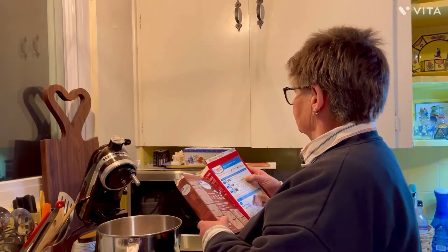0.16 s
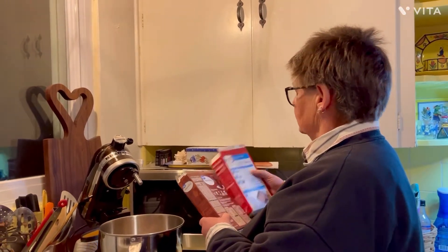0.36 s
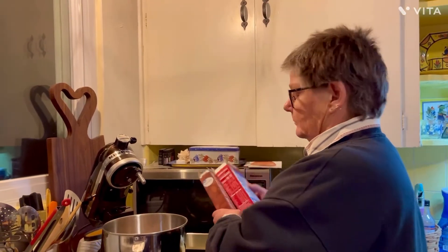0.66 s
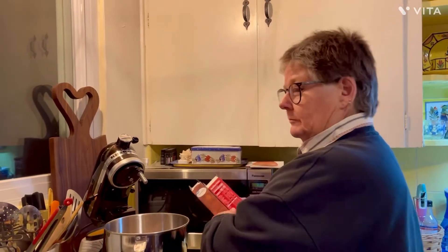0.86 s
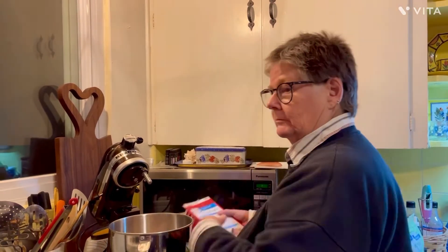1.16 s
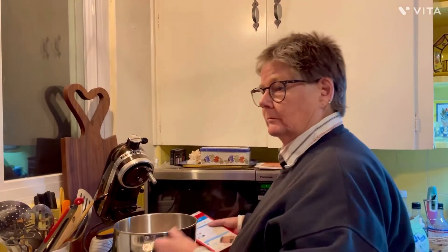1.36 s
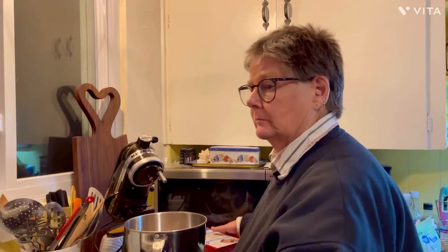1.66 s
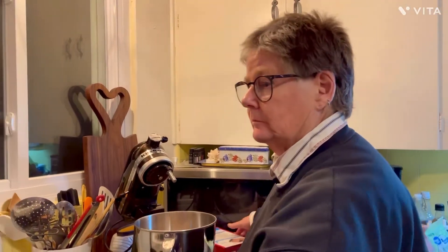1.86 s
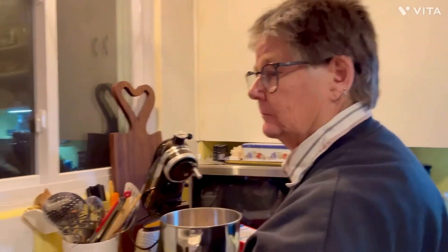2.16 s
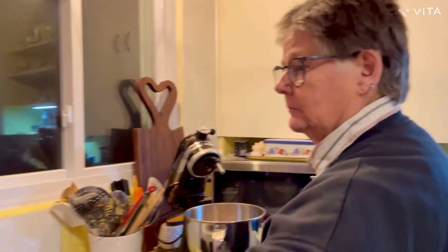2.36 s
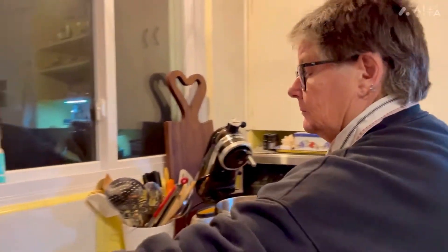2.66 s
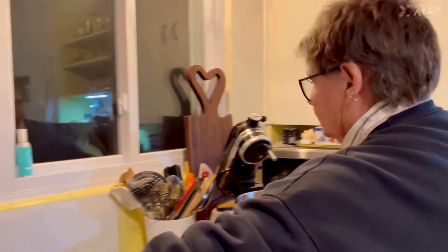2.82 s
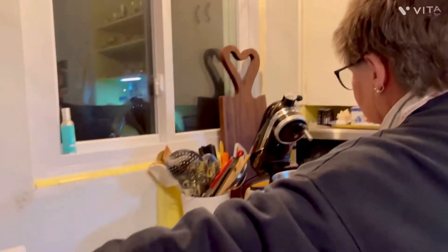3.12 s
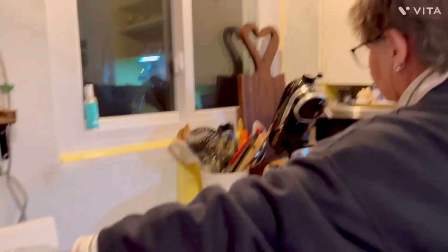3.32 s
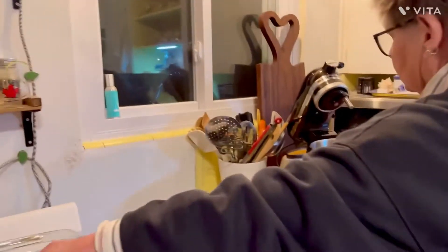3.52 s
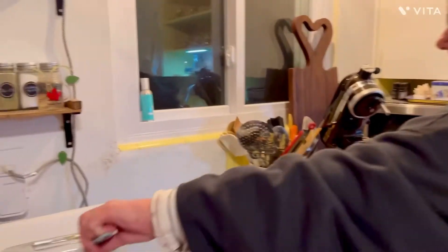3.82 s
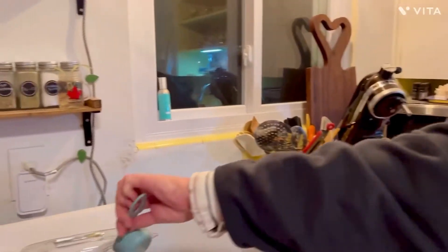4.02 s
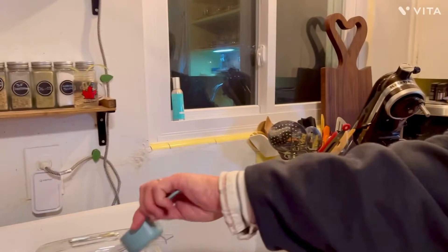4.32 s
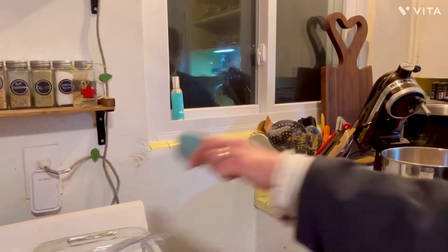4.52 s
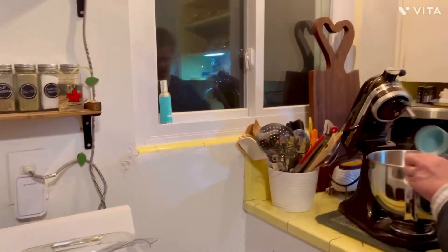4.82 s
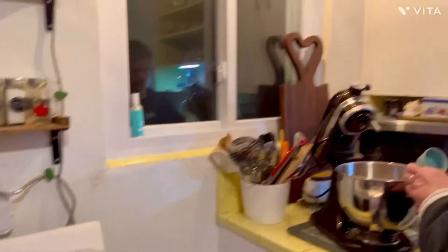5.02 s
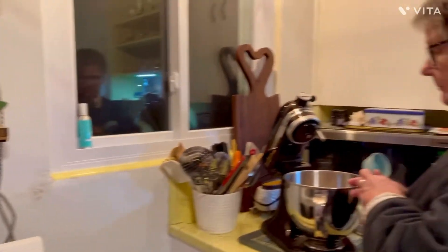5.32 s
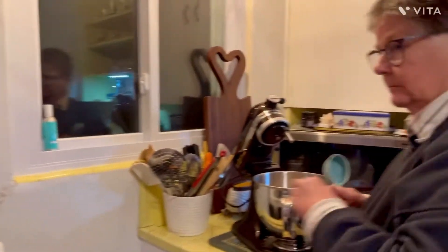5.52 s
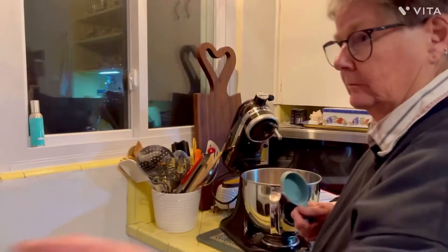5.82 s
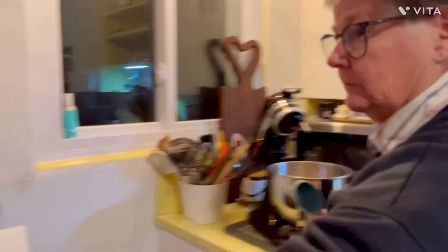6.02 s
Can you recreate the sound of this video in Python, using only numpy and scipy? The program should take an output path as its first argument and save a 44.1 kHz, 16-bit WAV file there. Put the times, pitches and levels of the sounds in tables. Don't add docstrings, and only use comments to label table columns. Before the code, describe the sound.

Dull, hollow card knocks and short scuffs come in clusters while sleeves rustle close by. Then hard plastic cups are pulled from a rack at left, clicking sharply in irregular bursts with brief wall rings and low thumps, moving toward the centre as they are lifted. Afterwards only faint hum, soft cloth movement and tiny finger taps remain. Small live kitchen, hand-held stereo phone.

```python
import sys
import numpy as np
from scipy import signal
from scipy.fft import rfft, irfft, next_fast_len
from scipy.io import wavfile
from scipy.ndimage import uniform_filter1d, map_coordinates

SR = 44100
rng = np.random.default_rng(int(sys.argv[2]) if len(sys.argv) > 2 else 0)


def master(y):
    cut = np.clip(np.atleast_2d(y).T, -1, 1)
    pcm = np.round(cut * 32767)
    wavfile.write(sys.argv[1], SR, pcm.astype(np.int16))


def volts_from_decibels(level):
    exponent = np.asarray(level, float) / 20
    return 10 ** exponent


N = 272375


def unit(x):
    return x / np.sqrt(np.mean(x ** 2) + 1e-20)


def along(points, hz):
    f, value = np.transpose(points)
    return np.interp(np.log(hz + 1), np.log(f + 1), value)


def wobble(rate):
    t = np.arange(0, N + 16, 16) / SR
    knots = rng.standard_normal(int(N * rate / SR) + 4)
    return np.interp(np.arange(N) / SR, t, map_coordinates(knots, [t * rate]))


def swells(times, fade_s, db):
    rise_share = 0.89
    t = np.arange(0, N, 64) / SR
    late = (t - np.c_[times]) / np.c_[fade_s]
    gains = volts_from_decibels(np.c_[db] - 10 * np.maximum(late, -late / rise_share))
    return np.interp(np.arange(N) / SR, t, np.sqrt((gains ** 2).sum(axis=0)))


def filtered(x, response):
    n = x.shape[-1]
    m = next_fast_len(n + 8192)
    return irfft(rfft(x, m) * response(np.fft.rfftfreq(m, 1 / SR)), m)[..., :n]


def shifted(x, lead, colour):
    def response(hz):
        turn = np.outer([.5, -.5], along(lead, hz))
        return volts_from_decibels(along(colour, hz)) * np.exp(1j * turn)
    return filtered(x, response)


# (frequency [Hz], likeness [0 to 1])
PORT_LIKENESS = [(60, .92), (160, .96), (300, .9), (500, .62), (1200, .62), (2500, .62), (7000, .45),
                 (8200, .78), (9400, .88), (9900, .995), (10700, .995), (11200, .9), (13000, .8)]


def spread(pair):
    def response(hz):
        turn = np.arccos(np.clip(along(PORT_LIKENESS, hz), -1, 1)) / 2
        return np.array([np.cos(turn), np.sin(turn)])
    mid, side = filtered(pair, response)
    return np.array([mid + side, mid - side])


def rush(spectrum, patchy_db):
    z = signal.stft(rng.standard_normal((2, N)), nperseg=512)[2]
    field = uniform_filter1d(rng.standard_normal(z.shape[1:]), size=6, axis=0)
    field = uniform_filter1d(field, size=8, axis=1)
    pair = signal.istft(z * volts_from_decibels(patchy_db * unit(field)), nperseg=512)[1][:, :N]
    return unit(filtered(pair, lambda hz: volts_from_decibels(along(spectrum, hz))))


def ring(modes, t, scatter_db, rough):
    hz, db, t60 = np.transpose(modes)[:, :, None]
    steps = rng.standard_normal((len(hz), len(t) // 16 + 1)).repeat(16, axis=1)
    chance = rng.standard_normal((2, 2, len(hz)))
    life = t[t < t60.max()]
    waver = rough * np.cumsum(steps[:, :len(life)], axis=1) * np.sqrt(hz / SR) / 4
    tones = volts_from_decibels(db - 60 * life / np.maximum(t60, .005)) * np.sin(2 * np.pi * hz * life + waver)
    views = (volts_from_decibels(scatter_db * chance[0]) * np.sign(chance[1])) @ tones
    return np.pad(views, ((0, 0), (0, len(t) - len(life)))) / np.abs(views[0]).max()


def crack(t, t60, lo_hz, hi_hz):
    band = signal.butter(2, [lo_hz, hi_hz], "bandpass", fs=SR, output="sos")
    burst = signal.sosfilt(band, rng.standard_normal((2, len(t))) * volts_from_decibels(-60 * t / t60))
    return burst / np.abs(burst[0]).max()


def chatter(length_s):
    t, chance = np.arange(SR // 24) / SR, rng.random((2, SR // 24))
    happens = chance[0] < .02
    touches = happens * (2 * chance[1] - 1) * np.exp(-t / max(length_s, .0005))
    touches[0] = 1.09
    return touches[None] / np.linalg.norm(touches)


def struck(sound, length_s):
    hit = signal.fftconvolve(sound, chatter(length_s), axes=1)
    return hit / np.abs(hit[0]).max()


# (frequency [Hz], time to fall 60 dB [s])
KITCHEN_DECAY = [(150, 0.61), (400, 0.38), (1000, 0.23), (3000, 0.23), (10000, 0.19), (12300, .15),
                 (13300, .02)]


def tails(count):
    hz, t, z = signal.stft(rng.standard_normal((count, 2, SR // 4)), SR, nperseg=256)
    fade = volts_from_decibels(-60 * t / along(KITCHEN_DECAY, hz)[:, None])
    tail = signal.istft(z * fade, SR, nperseg=256)[1]
    return tail / np.linalg.norm(tail[:, :1], axis=2, keepdims=True)


def kitchen(x, tail, wet_db):
    late = np.pad(x[:1], ((0, 0), (130, 0)))
    wet = volts_from_decibels(wet_db) * signal.fftconvolve(late, tail, axes=1)
    wet[:, :x.shape[1]] += x
    return wet


def add(track, s, x):
    track[:, round(s * SR):][:, :x.shape[1]] += x


def notes(rows, rise_cycles, rough, wet_db):
    out = np.zeros((2, N + SR))
    for s, db, hz, t60 in rows:
        t = np.arange(int(SR * np.clip(t60, .005, .25))) / SR
        chance = rng.standard_normal(SR // 64 + 2)
        waver = rough * np.cumsum(chance[1:])[np.arange(len(t)) // 16] * np.sqrt(hz / SR) / 4
        shape = volts_from_decibels(-60 * t / max(t60, .005)) * (1 - np.exp(-t * hz / rise_cycles))
        turn = 2 * np.pi * hz * t + waver
        views = np.array([np.sin(turn), 0.57 * np.tanh(chance[0]) * np.cos(turn)])
        add(out, s, volts_from_decibels(db) * shape / shape.max() * views)
    return kitchen(out, tails(count=1)[0], wet_db)[:, :N]


# (frequency [Hz], density [dB per Hz])
AIR_SPECTRUM = [(25, -58), (100, -0.5), (200, 0), (300, -4), (450, -13), (640, -21.5), (770, -11.5),
                (950, -30.5), (1250, -40.5), (2300, -25), (4000, -34), (9000, -37), (12000, -51.5),
                (13500, -120)]


def room_air():
    return volts_from_decibels(-55) * rush(AIR_SPECTRUM, patchy_db=-1.9)


# (frequency [Hz], density [dB per Hz])
RUMBLE_SPECTRUM = [(15, -59), (30, -7.5), (60, 9), (100, -9), (160, -4), (300, -120)]
# (time [s], level [dB])
GRIP_JOLTS = [(.02, -50), (.69, -55), (1.24, -45), (1.58, -45), (2.33, -52), (3.44, -50.5), (3.72, -40.5),
              (4.54, -54), (5.18, -59), (6.07, -70)]


def rumble():
    jolt_fade_s, house_db = 0.083, -58
    s, db = np.transpose(GRIP_JOLTS)
    jolts = swells(s, np.full(len(s), jolt_fade_s), db)
    house = volts_from_decibels(house_db + 1.1 * wobble(3.9))
    return np.hypot(jolts, house) * rush(RUMBLE_SPECTRUM, patchy_db=1.5)


# (frequency [Hz], level [dB rms], unsteadiness [dB])
FRIDGE_TONES = [(132.6, -55.5, -1.1), (64, -84, 0), (261.3, -66, 3), (229, -68, 3), (1675, -85.5, 3.5)]


def fridge():
    t, hum = np.arange(N) / SR, 0
    for hz, db, loose_db in FRIDGE_TONES:
        level = volts_from_decibels(db + 4.0 + loose_db * wobble(16))
        hum = hum + level * np.sin(2 * np.pi * hz * t + 0.63 * loose_db * wobble(6.3))
    return hum


# (peak time [s], time to fade 10 dB [s], level [dB], crispness [dB])
RUB_STROKES = [(.31, .15, -66.5, -19), (.68, .13, -58, -14), (.95, .2, -69, -22), (1.22, .15, -74, -9),
               (1.45, .14, -63, -14), (1.63, .1, -60, -22), (1.86, .2, -75, -22), (2.29, .15, -71, -20),
               (2.68, .3, -72, -15), (2.93, .1, -60, -21), (3.36, .13, -57.5, -20), (3.47, .1, -59, -30),
               (3.7, .1, -57, -28), (3.97, .2, -57.5, -18), (4.15, .15, -64, -17), (4.45, .3, -75, -11),
               (4.75, .15, -77, -20), (4.96, .1, -80, -13), (5.39, .1, -75, -13), (5.63, .1, -74, -15),
               (5.85, .6, -68, -26)]
# (frequency [Hz], density [dB per Hz])
RUB_HISS = [(1500, -60), (3000, -5), (5000, -1), (7000, -1), (9000, -1), (11400, -2), (11900, -10),
            (12500, -120)]
# (frequency [Hz], density [dB per Hz])
RUB_BODY = [(150, -17), (350, 8.5), (800, 6), (1250, 2), (1900, 2.5), (2600, -3), (4000, -11.5),
            (7000, -17)]


def rustle():
    stir_s = 0.29
    s, fade_s, db, crisp_db = np.transpose(RUB_STROKES)
    moving = np.clip((np.arange(N) / SR - stir_s) / 0.084 + 1, 0, 1)
    grain = volts_from_decibels(1.2 * wobble(40) + 1.2 * wobble(300))
    hiss = volts_from_decibels(24.0) * swells(s, fade_s, db + crisp_db) * rush(RUB_HISS, patchy_db=2.5)
    body = volts_from_decibels(11.5) * swells(s, fade_s, db) * rush(RUB_BODY, patchy_db=1.9)
    return moving * grain * (hiss + body)


# (time [s], peak level
# [dB], chatter [s])
SCUFF_EVENTS = [(.616, -41, .02), (.668, -39, .02), (.697, -41, .012), (1.222, -44, .004),
                (1.524, -43, .008), (1.584, -37, .012), (1.594, -35, .01), (1.62, -44, .015),
                (3.372, -24, .001), (3.428, -38, .004), (5.3305, -53, .001), (5.434, -52, .006),
                (5.601, -51, .001), (2.2935, -42, .001), (2.9505, -22, .0006), (3.2955, -21, .0006),
                (3.3135, -22, .0006), (3.3245, -19, .0006), (3.8145, -23, .0006), (3.6255, -31, .0006),
                (1.533, -41, .004), (.77, -44, .004), (.647, -41, .004)]


def scuffs():
    out, t = np.zeros((2, N + SR)), np.arange(SR // 40) / SR
    room = tails(count=1)[0]
    for s, db, length_s in SCUFF_EVENTS:
        scuff = struck(crack(t, .012, 800, 5000), length_s)
        add(out, s, volts_from_decibels(db) * kitchen(scuff, room, wet_db=-7))
    return out[:, :N]


# (time [s], peak level [dB])
TICK_EVENTS = [
    (.952, -55),
    (1.185, -49),
    (1.7548, -43.5),
    (5.352, -56),
    (5.426, -50),
    (5.598, -59),
]


def ticks():
    out, t = np.zeros((2, N + 2 * SR)), np.arange(SR // 7) / SR
    for (s, db), room in zip(TICK_EVENTS, tails(count=13)):
        tick = struck(crack(t, 0.02, 2000, 7000), 0.01)
        add(out, s, volts_from_decibels(db) * kitchen(tick, room, wet_db=-3))
    return out[:, :N]


# (frequency [Hz], level [dB])
CARD_MODES = [(135, -15), (200, -15), (250, -0.5), (300, -6.5), (385, -4.5), (470, -3.5), (735, 0.5),
              (900, -0.5), (1010, -6.5), (1270, 0)]


def knock(hz, edge_db, t60, length_s):
    t = np.arange(SR // 7) / SR
    grip = 1 + 0.037 * rng.standard_normal(len(CARD_MODES))
    modes = [(hz, 2, .5 * t60)]
    for (f, level), g in zip(CARD_MODES, grip):
        mode_t60 = 0.57 * t60 * (300 / f) ** 0.27
        modes.append((f * g, level - 10 * abs(np.log2(f / hz)), mode_t60))
    body = ring(modes, t, scatter_db=3.0, rough=0.36) + 0.42 * crack(t, 0.88 * t60, .5 * hz, 2 * hz)
    edge = volts_from_decibels(edge_db - 7.0) * crack(t, 0.067, 440, 2800)
    return struck(body * (1 - np.exp(-t / 0.0023)) + edge, 0.51 * length_s)


# (time [s], peak level [dB], loudest ring [Hz], edge [dB])
BOX_KNOCKS = [(.351, -40.5, 500, -3), (0.483, -43, 239, 4), (.515, -26.5, 421, -23), (0.571, -36, 367, -40),
              (.617, -29, 358, -13), (.644, -30.5, 343, -20), (.67, -26, 681, -10.5), (0.698, -35, 432, -9),
              (.765, -36, 387, -30), (.934, -45, 264, 5), (1.182, -37.5, 203, -4), (1.219, -26, 440, -13),
              (1.231, -26, 279, -35), (1.288, -38, 356, -32), (1.529, -33.5, 1062, -12),
              (1.538, -29, 263, -43), (1.574, -33, 393, -27), (1.589, -27, 401, -6), (1.613, -34, 330, -41),
              (1.643, -40, 251, -31), (1.796, -42.5, 197, -4), (2.268, -45, 650, -11),
              (2.292, -37, 178, -18)]
# (time [s], peak level [dB], loudest ring [Hz])
RACK_THUMPS = [(2.86, -29, 734), (2.879, -34, 595), (2.949, -39, 299), (3.295, -36.5, 293),
               (3.334, -30, 762), (3.371, -36.5, 287), (3.585, -34.5, 288), (3.624, -34.5, 251),
               (3.816, -31, 672), (3.839, -31.5, 345), (4.012, -29, 781), (4.108, -32.5, 735)]
# (time [s], peak level [dB], loudest ring [Hz])
FINGER_TAPS = [
    (.236, -47.5, 863),
    (.264, -60, 860),
    (2.08, -52, 844),
    (5.33, -48.5, 734),
    (5.436, -48.5, 790),
    (5.602, -49.5, 1027),
]


def boxes():
    out, rooms, knocks = np.zeros((2, N + 2 * SR)), tails(count=13), []
    for s, db, hz, edge_db in BOX_KNOCKS:
        t60 = 0.1 * (300 / hz) ** 0.073
        length_s = 0.016 * volts_from_decibels(0.05 * (edge_db + 6))
        knocks.append((s, db, hz, edge_db, t60, length_s))
    knocks += [(*row, -35.5, 0.14, 0.026) for row in RACK_THUMPS]
    knocks += [(*row, -17, 0.12, 0.001) for row in FINGER_TAPS]
    for k, (s, db, *how) in enumerate(knocks):
        add(out, s, volts_from_decibels(db) * kitchen(knock(*how), rooms[k % len(rooms)], wet_db=-9))
    return out[:, :N]


# (time [s], peak level [dB], frequency [Hz], time to fall 60 dB [s])
PANEL_TONES = [(.513, -26.5, 790, 0.055), (.519, -26, 257.4, 0.08), (.538, -29.5, 292, 0.073),
               (.57, -42, 860, 0.055), (.617, -33.5, 700, 0.05), (.63, -32.5, 330, 0.076),
               (.63, -42.5, 2900, .04), (.685, -32.5, 375, .06), (.7, -47, 2900, .04),
               (1.221, -20.5, 447, 0.05), (1.222, -28.5, 720, 0.075), (1.223, -35, 1304, 0.047),
               (1.231, -23, 278.5, .1), (1.25, -31, 432, .12), (1.298, -36, 307, 0.1),
               (1.335, -40, 254, 0.091), (1.524, -34, 970, 0.017), (1.53, -31.5, 1040, 0.028),
               (1.541, -25.5, 268, .08), (1.593, -25.5, 250, .08), (1.592, -33, 1503, .05),
               (1.594, -45, 2500, 0.017), (1.615, -39, 1450, 0.045), (1.645, -39, 298, 0.07),
               (1.71, -44.5, 412, 0.051), (1.755, -53, 2400, .05), (1.238, -30, 205, 0.11),
               (1.19, -49.5, 2090, .05), (2.296, -32.5, 220, 0.048), (2.318, -38, 152, 0.06),
               (2.294, -41, 900, 0.014), (5.331, -43.5, 756, .03), (5.331, -52.5, 2700, .015),
               (5.353, -51, 600, .03), (5.434, -51.5, 1200, 0.036), (5.602, -43, 1100, .025),
               (1.586, -38, 2000, .015), (1.6, -45, 3300, .02), (.351, -46, 894, .03)]


def box_tones():
    return notes(PANEL_TONES, rise_cycles=0.34, rough=.8, wet_db=-11.5)


# (frequency [Hz], level [dB], time to fall 60 dB [s])
WALL_MODES = [(1020, -5.5, 0.16), (1323, -7.5, 0.32), (1420, -2.5, 0.065), (1550, 0, 0.059),
              (1729, 0.5, 0.04), (1810, -27, 0.016), (2098, 4, 0.04), (2020, -1, 0.13), (2170, -6, 0.17),
              (2300, -5.5, 0.23), (2500, -7.5, 0.29), (2684, -6, 0.079), (2850, -8, 0.086),
              (3270, -23.5, 0.14), (4020, -9, 0.11), (4427, -21.5, 0.03), (4750, -12, 0.071),
              (734, -20, 0.04), (412, -32, .12)]
# (frequency [Hz], level [dB], time to fall 60 dB [s])
RIM_MODES = [(5900, -14, .04), (6560, -14, .04), (7630, -6, .05), (8170, -8, .04), (8850, -4, .04),
             (9590, -4, .04), (10300, 0, .05), (10780, 2, .05), (11550, -6, .04), (12200, -10, .03)]


def cup_contact(hz, snap_db, t60, rocking_s):
    t = np.arange(SR // 8) / SR
    grip = 1 + 0.0051 * rng.standard_normal(len(WALL_MODES))
    modes = [(hz, 2, 0.91 * t60)]
    for (f, level, hold), g in zip(WALL_MODES, grip):
        modes.append((f * g, level - 9 * abs(np.log2(f / hz)), hold * t60 / 0.073))
    walls = ring(modes, t, scatter_db=2.5, rough=0.15)
    click = 0.71 * ring([(hz, 0, .016), (1.22 * hz, -7, .01)], t, scatter_db=0.0, rough=0.22)
    click += 0.54 * crack(t, 1.0 * t60, 0.55 * hz, 2.15 * hz)
    rim = 0.38 * ring(RIM_MODES, t, scatter_db=8.5, rough=0.76)
    rim += crack(t, 0.0088, 7000, 10500) + 0.19 * crack(t, 0.023, 1900, 6600)
    sound = (walls + click) * (1 - np.exp(-t / 0.0003)) + volts_from_decibels(snap_db + 3.5) * rim
    return struck(sound, rocking_s * 2000 / hz)


# (time [s], peak level [dB], loudest ring [Hz], treble snap [dB])
RIM_HITS = [(2.8517, -33, 1510, -7), (2.858, -24, 1110, -16.5), (2.951, -20, 2420, -15.5),
            (2.9578, -15.5, 1990, -8), (2.98, -30, 2300, -22), (3.1728, -10, 1810, 4),
            (3.1903, -11.5, 1834, -8), (3.2952, -18, 2560, -1.5), (3.3134, -17, 2230, -8),
            (3.3235, -17, 2300, -26), (3.3615, -24.5, 1340, -7.5), (3.3723, -21, 1507, -14),
            (3.4174, -32, 1380, -39), (3.586, -18.5, 1490, -9), (3.601, -22, 2100, -28),
            (3.6245, -27.5, 1020, -22.5), (3.8058, -34, 1310, -13), (3.8139, -14.5, 1190, -11),
            (4.01, -35, 2330, -17), (4.0894, -37, 2080, -25)]
# (time [s], peak level [dB], loudest ring [Hz], ring time to fall 60 dB [s])
WALL_HITS = [(2.8641, -22, 1580, 0.023), (2.8747, -27, 2020, 0.061), (2.885, -35, 1370, 0.022),
             (3.2079, -22, 1900, 0.1), (3.2885, -22, 1420, 0.094), (3.333, -22, 1864, 0.027),
             (3.379, -38, 2010, 0.04), (3.434, -33.5, 1280, 0.028), (3.6122, -21.5, 1043, 0.067),
             (3.644, -27, 1420, .04), (3.663, -34, 1440, 0.072), (3.7057, -37.5, 1550, 0.041),
             (3.8223, -19, 1880, 0.05), (3.8339, -21, 1034, 0.09), (3.8394, -18.5, 2180, 0.031),
             (3.868, -30, 1700, 0.03), (3.927, -37, 2460, 0.1), (4.0145, -17, 2070, 0.035),
             (4.1063, -23, 2000, 0.034)]


def cups():
    rim_t60_s, wall_snap_db = 0.034, -28.5
    rim_rocking_s, wall_rocking_s = 0.0017, 0.0041
    out, rooms = np.zeros((2, N + 2 * SR)), tails(count=13)
    contacts = [(*row, rim_t60_s, rim_rocking_s) for row in RIM_HITS]
    contacts += [(s, db, hz, wall_snap_db, t60, wall_rocking_s) for s, db, hz, t60 in WALL_HITS]
    for k, (s, db, *how) in enumerate(contacts):
        add(out, s, volts_from_decibels(db) * kitchen(cup_contact(*how), rooms[k % len(rooms)], wet_db=-5.5))
    return out[:, :N]


# (time [s], peak level [dB],
# frequency [Hz], time to fall 60 dB [s])
CUP_TONES = [(2.862, -39, 3230, 0.034), (2.868, -25, 2020, 0.067), (2.905, -42, 2590, 0.29),
             (2.95, -13, 2470, .014), (2.957, -19, 2024, 0.091), (2.96, -32, 1023, 0.066),
             (2.975, -32.5, 2310, .16), (2.98, -37.5, 1388, 0.22), (3.1745, -18.5, 1810, 0.016),
             (3.174, -27, 2650, .014), (3.175, -34, 4340, 0.023), (3.197, -18.5, 2017, 0.14),
             (3.195, -32.5, 1408, 0.35), (3.192, -37, 3350, .2), (3.21, -43.5, 4830, 0.14),
             (3.2965, -17.5, 2650, 0.012), (3.297, -34.5, 4790, 0.036), (3.314, -34, 3370, 0.095),
             (3.3245, -17.5, 2700, 0.013), (3.328, -21.5, 2020, 0.11), (3.373, -25.5, 1480, 0.014),
             (3.381, -31, 2020, .1), (3.418, -36, 1000, .03), (3.428, -34.5, 790, 0.049),
             (3.48, -44, 980, .05), (3.603, -29, 1028, .13), (3.597, -32, 2800, .05),
             (3.632, -35, 2078, .08), (3.664, -36, 1410, .08), (3.682, -39, 2094, .15),
             (3.705, -47.5, 2830, .06), (3.815, -25, 1040, 0.11), (3.84, -30, 2060, 0.064),
             (3.842, -26.5, 2166, 0.22), (3.84, -29.5, 2836, .08), (3.84, -37.5, 5087, .06),
             (4.015, -27.5, 2467, 0.13), (4.016, -43, 3321, 0.3), (4.015, -27.5, 3849, 0.054),
             (4.015, -39, 4780, 0.11), (4.015, -29, 1550, 0.045), (4.02, -35.5, 1335, 0.15),
             (4.04, -37, 1003, .12), (4.107, -34.5, 2500, 0.09), (4.107, -38.5, 3840, 0.036),
             (4.18, -43, 2100, 0.045),
             (2.958, -26.5, 11300, 0.031), (2.958, -22, 11900, .02), (2.951, -21, 15400, .012),
             (2.957, -18, 13000, .012), (3.173, -17, 10700, .03), (3.173, -17, 14300, .006),
             (3.173, -15, 13000, .01), (3.174, -27.5, 7630, 0.072), (3.191, -27, 10500, .035),
             (3.296, -28, 10600, .03), (3.314, -32, 10500, .03), (4.015, -18, 2083, 0.095),
             (3.1905, -9.5, 1825, .022), (2.95, -19.5, 2000, 0.015), (3.173, -19, 9000, .015),
             (3.1915, -24, 9200, .015), (3.362, -30, 9100, .012), (3.586, -32, 3550, .025),
             (4.095, -35, 2083, .06), (4.108, -32, 2083, .09), (3.64, -41, 3800, .04),
             (3.799, -44, 1200, .04)]


def cup_tones():
    return notes(CUP_TONES, rise_cycles=0.79, rough=.16, wet_db=-14)


# (frequency [Hz], left leads [radians])
RACK_LEAN = [(500, 0), (1300, 1.6), (2700, 1.2), (3600, 0)]


def scene():
    lift_s, lift_takes_s = 3.76, .1
    sounding = slice(round(2.7 * SR), round(4.7 * SR))
    background = room_air() + rumble() + fridge() + rustle()
    rest = background + scuffs() + ticks() + boxes() + box_tones()
    ports = spread(rest) * volts_from_decibels([[.3], [-.3]])
    clatter = spread((cups() + cup_tones())[:, sounding])
    at_rack = shifted(clatter, RACK_LEAN, [(20, 0.03)]) * volts_from_decibels([[-.3], [.3]])
    lifted = np.clip((np.arange(N)[sounding] / SR - lift_s) / lift_takes_s + .5, 0, 1)
    ports[:, sounding] += (1 - lifted) * at_rack + lifted * clatter
    return ports


def roll_off(x):
    return signal.sosfilt(signal.butter(12, 16830, fs=SR, output="sos"), x)


# (frequency [Hz], left leads [radians])
PORT_LEAD = [(300, 0), (3000, -.3), (5000, -.8), (6200, -.2), (7300, -2), (8700, -.3), (9500, 1.8),
             (10000, 2.95), (10600, 3.35), (11000, 4.1), (11600, 6.2), (12400, 6.6), (13000, 9.2),
             (16000, 12.5)]
# (frequency [Hz], level [dB])
PORT_COLOUR = [(20, 0), (8600, 0), (9600, 2), (10400, 6), (11000, 5), (11800, -3), (12500, -18),
               (13200, -26), (16500, -27), (17000, -120)]


def record(dry):
    mix = shifted(dry, PORT_LEAD, PORT_COLOUR)
    return roll_off(mix)


dry = scene()
out = record(dry)
master(out)
```